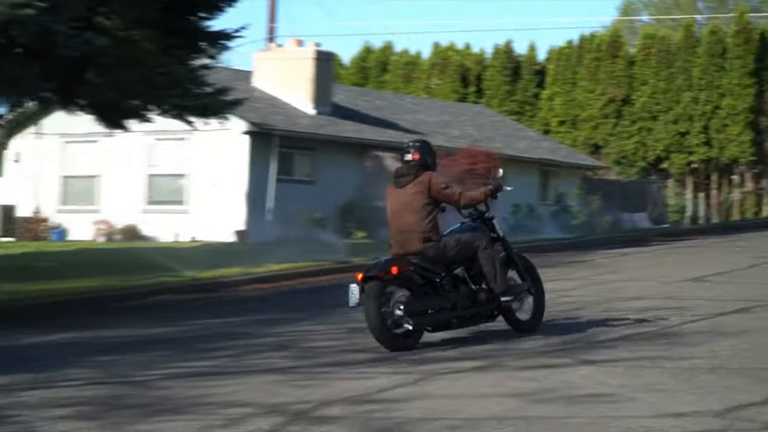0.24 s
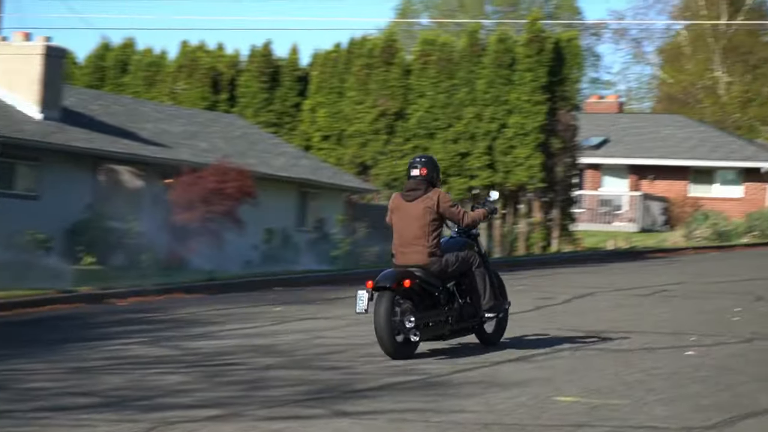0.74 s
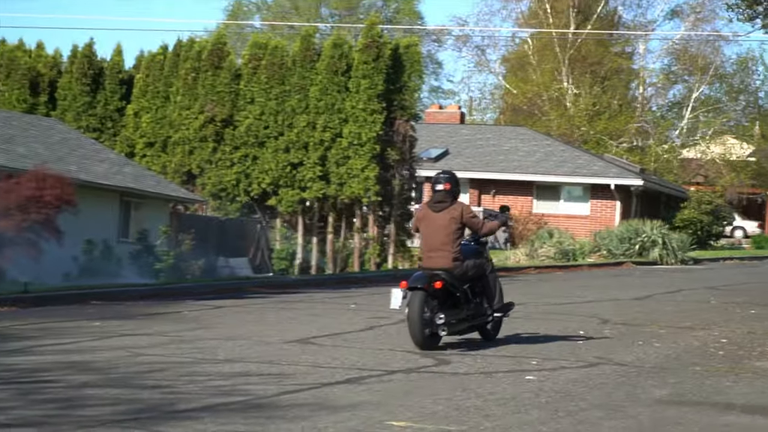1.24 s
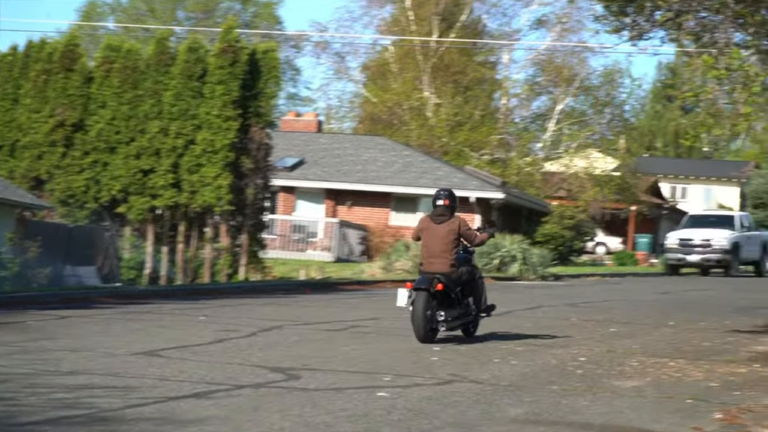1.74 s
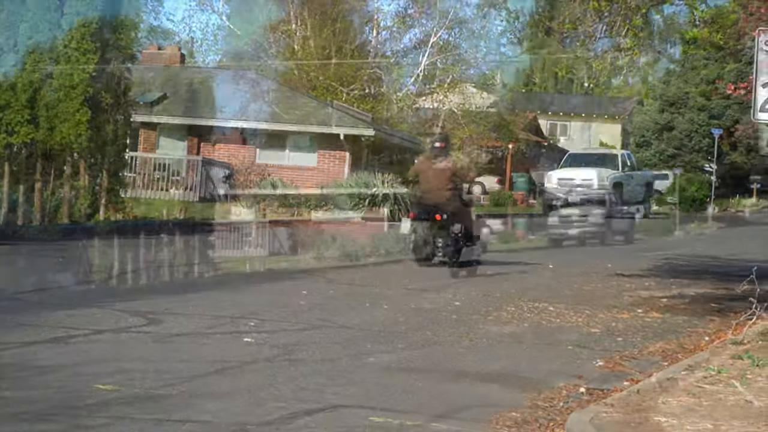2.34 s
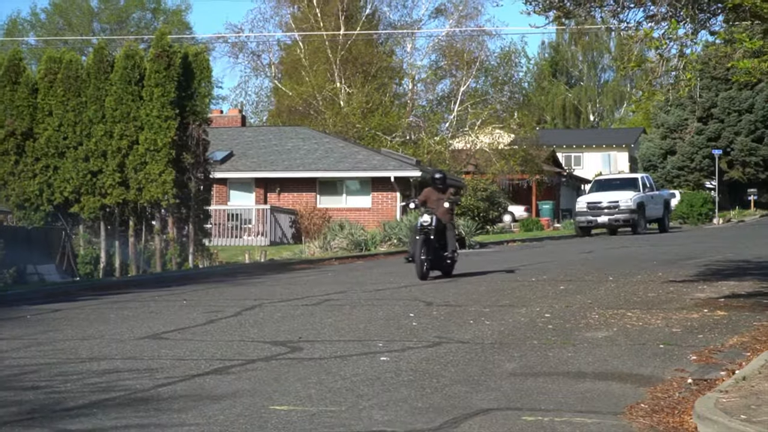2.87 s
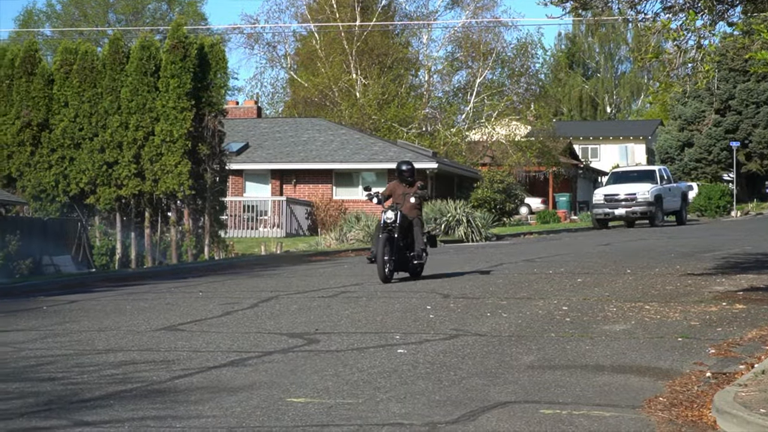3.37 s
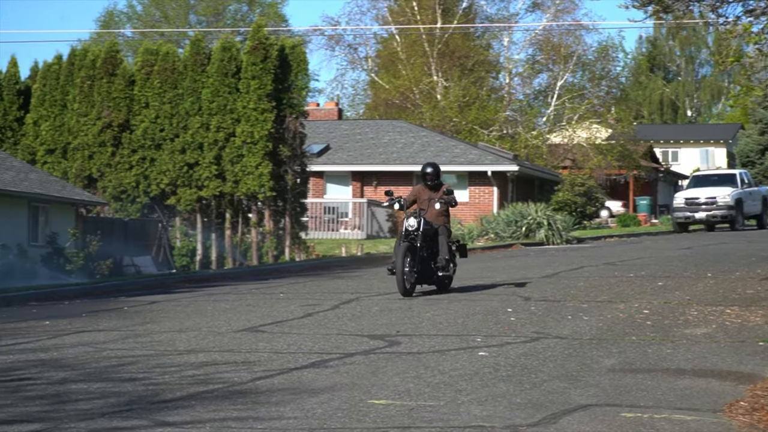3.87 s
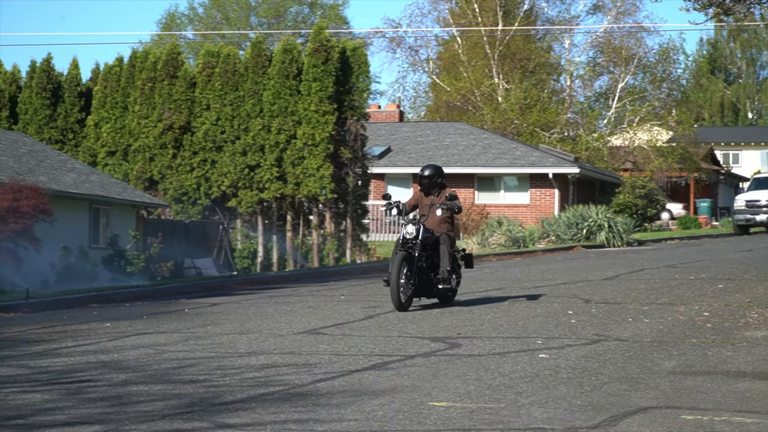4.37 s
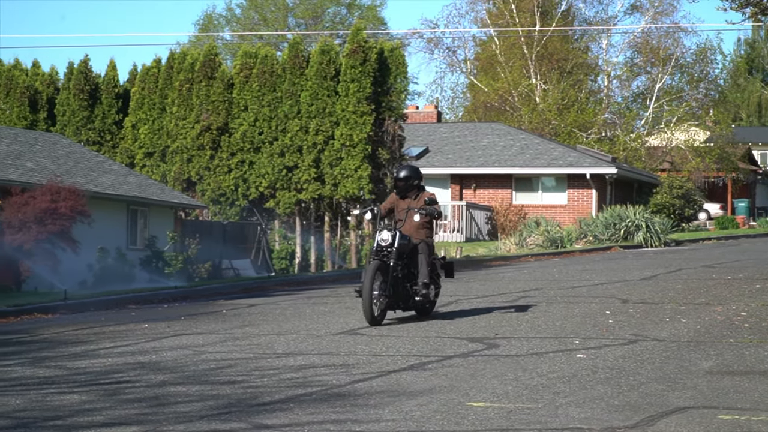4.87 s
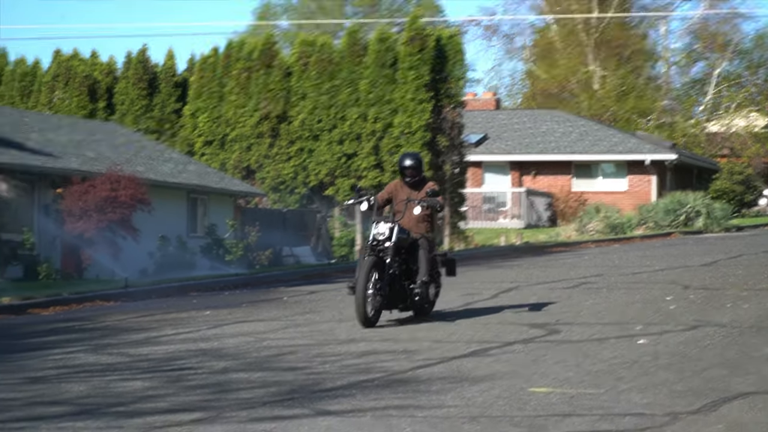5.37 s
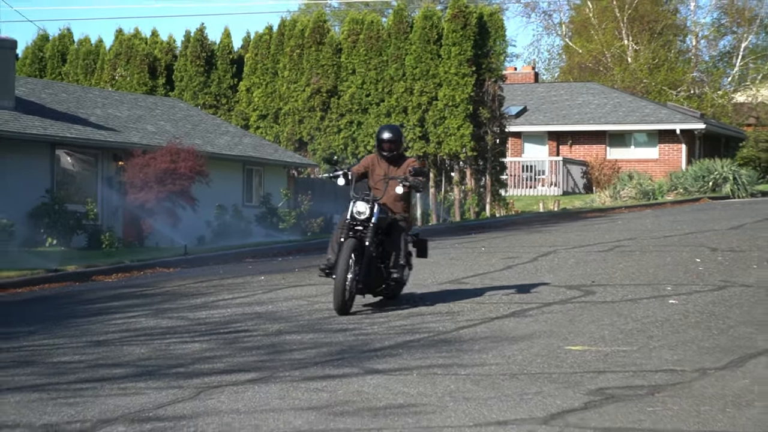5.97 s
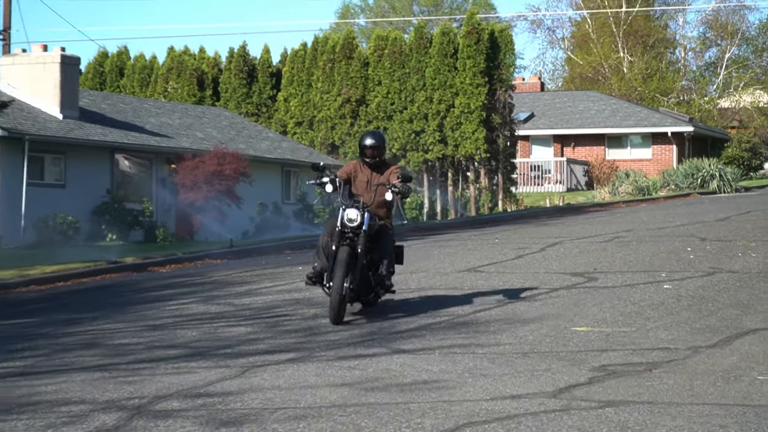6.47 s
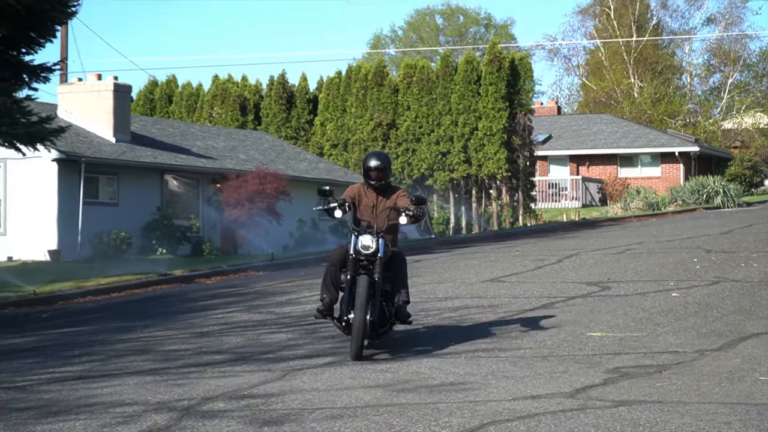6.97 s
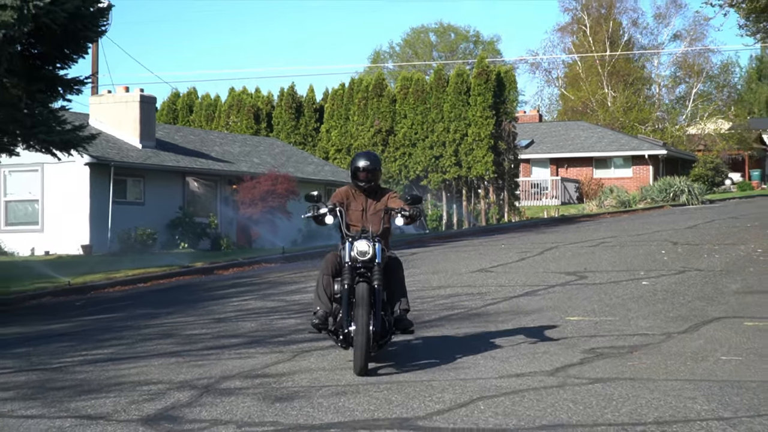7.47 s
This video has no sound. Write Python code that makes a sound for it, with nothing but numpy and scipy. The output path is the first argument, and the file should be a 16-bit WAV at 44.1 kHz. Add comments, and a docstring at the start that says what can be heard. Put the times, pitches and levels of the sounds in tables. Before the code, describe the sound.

On a quiet street, a large motorcycle accelerates away from the microphone with a booming, uneven exhaust and one sharp crack. After about two seconds the throttle closes and the gearbox clunks. Now quieter and more distant, the engine settles to a thumping idle, knocks into gear and rolls slowly nearer with light valve ticking. A few faint bird chirps sit behind it.

```python
"""A big V-twin motorcycle pulls away up a quiet street; the revs climb until the throttle shuts with a
clunk. It then rolls back from further off: the revs sink to a loping idle, a gear knocks in, it nears.
Two unevenly spaced firings per cycle drive the exhaust boom, pipe bark and rasp; valves tick, meshes
whine, the drive belt hums. Behind it: street noise, a faint bird and a dull echo off the houses."""
import sys
import numpy as np
from scipy import signal
from scipy.fft import rfft, irfft, next_fast_len
from scipy.io import wavfile

SR = 44100
rng = np.random.default_rng(int(sys.argv[2]) if len(sys.argv) > 2 else 0)


def unload_audio(sound):
    """Save the sound as a 16-bit wav file, at the path given as the first command line argument."""
    columns = np.transpose(np.atleast_2d(sound))
    # keep every value between -1 and 1, then stretch to whole-number steps
    steps = np.round(np.clip(columns, -1, 1) * 32767)
    wavfile.write(sys.argv[1], SR, steps.astype(np.int16))


N = 340452
TIME = np.arange(N) / SR
FIRING_LAG = 315 / 720  # second cylinder after the first [cycles]
START_RPM, THROTTLE_SHUT_S = 1801, 2.17
COAST_RPM, IDLE_RPM, SINK_AT_S = 1375, 1049.75, 2.965


def from_db(db):
    """Decibels to gain."""
    return 10 ** (np.asarray(db) / 20)


def unit_rms(x):
    """Scale to an rms of 1."""
    return x / np.sqrt(np.mean(x ** 2) + 1e-20)


def drift(corner_hz):
    """Smooth random wander, rms 1."""
    step = 40
    pole = np.exp(-2 * np.pi * corner_hz * step / SR)
    noise = rng.standard_normal(N // step + 2002)
    slow = signal.lfilter([1], [1, -2 * pole, pole * pole], noise)[2000:]
    return np.interp(np.arange(N) / step, np.arange(len(slow)), unit_rms(slow))


def cut(x, hz, kind, order=4):
    """Butterworth high- or low-pass."""
    return signal.sosfilt(signal.butter(order, hz, kind, fs=SR, output="sos"), x)


def coloured(x, spectrum):
    """Filter by a curve of (frequency [Hz], gain [dB])."""
    size = next_fast_len(N + 4096)
    hz, gain_db = np.transpose(spectrum)
    log_hz = np.log(np.arange(size // 2 + 1) * SR / size + 1)
    return irfft(rfft(x, size) * from_db(np.interp(log_hz, np.log(hz), gain_db)), size)[:N]


def hump(x, centre, half_width):
    """Resonance curve, peak 1."""
    return 1 / (1 + ((x - centre) / half_width) ** 2)


def ring(clicks, hz, t60_s):
    """One mode: a unit click starts a decaying sine of height 1."""
    r, w = from_db(-60 / (t60_s * SR)), 2 * np.pi * hz / SR
    return signal.lfilter([0, np.sin(w)], [1, -2 * r * np.cos(w), r * r], clicks + 1e-18)


def decay(clicks, tau_s):
    """Each click starts an exponential envelope."""
    return signal.lfilter([1], [1, -np.exp(-1 / (tau_s * SR))], clicks + 1e-18)


def each_cycle(cycle, phase, spread_db):
    """A click of random strength whenever the engine passes `phase` [cycles]."""
    passed = np.diff(np.floor(cycle - phase), prepend=np.floor(-phase)) > 0
    return passed * from_db(spread_db * np.clip(rng.standard_normal(N), -2, 2))


def crank(rpm):
    """Four-stroke cycles turned so far, two revolutions each."""
    return np.cumsum(rpm) / SR / 120


def nearness_db(start_s, from_m, m_per_s):
    """Spherical spreading at constant speed, 0 dB at start_s."""
    distance_m = np.maximum(from_m + m_per_s * (TIME - start_s), 1)
    return 20 * np.log10(from_m / distance_m)


def street():
    """Steady, low background noise."""
    # noise spectrum: (frequency [Hz], relative level [dB])
    spectrum = [(30, -29), (100, -3), (400, -6), (1000, -12.5), (2500, -26), (6000, -25), (10000, -31.5),
                (15000, -37.5)]
    return from_db(-49.5) * unit_rms(coloured(rng.standard_normal(N), spectrum))


def bird():
    """Short gliding whistles from the trees."""
    # chirps: (time [s], length [s], start [Hz], end [Hz], level [dB])
    chirps = [(5.93, 0.068, 5130, 3270, -54), (6.04, .08, 5040, 3330, -58), (6.43, 0.08, 4300, 3370, -56),
              (6.823, 0.1, 5100, 3360, -55), (7.047, .06, 3670, 4500, -53)]
    out = np.zeros(N)
    for at_s, length_s, start_hz, end_hz, db in chirps:
        along = np.clip((TIME - at_s) / length_s, 0, 1)
        hz = start_hz + (end_hz - start_hz) * along + 60 * drift(79)
        out += from_db(db) * np.sin(np.pi * along) * np.sin(2 * np.pi * np.cumsum(hz) / SR)
    return out


def house_echo(x, echo_db, tau_s, lowpass_hz):
    """House fronts and hedges scatter back a faint dull tail."""
    age_s = np.arange(SR // 2) / SR
    tail = rng.standard_normal(len(age_s)) * np.exp(-age_s / tau_s) * (age_s > .025)
    echo = signal.fftconvolve(x, tail / np.linalg.norm(tail))[:N]
    return from_db(echo_db) * cut(echo, lowpass_hz, "low", order=2)


def belt(start_s=4.9, fade_s=1, start_hz=305, hz_per_s=17):
    """The toothed belt hums, rising slowly in pitch."""
    age_s = np.maximum(TIME - start_s, 0)
    hz = start_hz + hz_per_s * age_s + 1.57 * drift(5.3)
    level = np.minimum(age_s / fade_s, 1) * from_db(-57 + 1.4 * drift(5.6))
    return np.sqrt(2) * level * np.sin(2 * np.pi * np.cumsum(hz) / SR)


def whine(cycle, teeth, ripple, slack, chatter):
    """Mesh tone, smeared by crank surge and chain slack, chopped by uneven tooth contact."""
    turned = cycle + ripple * np.sin(4 * np.pi * cycle) + slack * drift(7.22)
    tone = np.sin(2 * np.pi * teeth * turned + chatter * drift(60))
    return unit_rms(tone * from_db(4.6 * chatter * drift(37)))


def engine_braking(cycle, rpm):
    """While the wheel drives the engine, each mesh whines as the revs sink through its range."""
    # meshes: (teeth [per cycle], loudest at [rpm], half width [rpm], level [dB])
    meshes = [(167.6, 1280, 110, -49.5), (134, 1115, 74, -55)]
    driven = np.interp(TIME - SINK_AT_S, [.45, .7], [1, 0])
    return driven * sum(from_db(db) * hump(rpm, at_rpm, width_rpm)
                        * whine(cycle, teeth, ripple=.0016, slack=.0024, chatter=1.03)
                        for teeth, at_rpm, width_rpm, db in meshes)


def sharp_knocks(crack_db, crack_s, crack_hz):
    """One exhaust crack while pulling away, then gear clunks; each a noise burst and ringing metal."""
    # sharp knocks: (time [s], level [dB])
    knocks = [(0.720, -16.5), (2.300, -16), (2.310, -16.5), (2.342, -38), (2.360, -22), (3.716, -19.5),
              (3.721, -18), (3.728, -22), (3.733, -28)]
    # metal case modes: (frequency [Hz], relative level [dB], t60 [s])
    modes = [(402, -6, 0.043), (770, -1, 0.029), (900, 7.5, 0.018), (1276, 2.5, 0.019), (1750, 3.5, 0.011),
             (2240, -3, 0.02), (2800, -8.5, 0.033), (3770, -19.5, 0.11), (5890, -41, .02)]
    at_s, knock_db = np.transpose(knocks)
    blows = np.bincount((at_s * SR).astype(int), from_db(knock_db), N)
    case = sum(ring(blows * from_db(db - 13.5 + rng.standard_normal(N)), hz, t60_s)
               for hz, db, t60_s in modes)
    bursts = decay(blows, crack_s) * rng.standard_normal(N)
    crack = cut(cut(bursts, crack_hz, "low", order=1), 6400, "low", order=8)
    body = from_db(-34) * ring(bursts, 360, .036)
    return cut(case, 4700, "low") + body + from_db(crack_db) * cut(crack, 320, "high", order=2)


def rattle(cycle, phase):
    """Each firing shakes thin metal, which rings briefly."""
    # valve gear and heat shield modes: (frequency [Hz], relative level [dB], t60 [s])
    modes = [(2615, -11, 0.03), (5590, -11.5, .012), (7460, -13.5, .008), (7740, -24, .008)]
    out = 0
    for hz, db, t60_s in modes:
        shakes = each_cycle(cycle, phase, 4.3) + each_cycle(cycle, phase + FIRING_LAG, 2.6)
        out += from_db(db) * ring(shakes, hz, t60_s)
    return out


def rasp(cycle, phase, colour, low_hz, jet_s, jet_db, spit_db, tick_s, tick_db):
    """Steady mechanical hiss, a bright jet per firing, and the ticks of four valves closing."""
    firings = (phase, phase + FIRING_LAG)
    jets = decay(sum(each_cycle(cycle, at, 2.6) for at in firings), jet_s)
    closings = sum(each_cycle(cycle, at + valve, 2.9) for at in firings for valve in (.2, .33))
    ticks = decay(closings, tick_s)
    hiss = (1 + from_db(jet_db) * jets + from_db(tick_db) * ticks) * rng.standard_normal(N)
    spit = from_db(spit_db) * cut(jets * rng.standard_normal(N), 6700, "high")
    return unit_rms(cut(coloured(hiss + spit, colour), low_hz, "high"))


def pipe_scatter(tau_s):
    """Pipe reflections smear a pulse in time but keep its spectrum flat."""
    age_s = np.arange(4096) / SR
    spectrum = rfft(rng.standard_normal(len(age_s)) * np.exp(-age_s / tau_s))
    return irfft(spectrum / np.abs(spectrum))[:len(age_s) // 2]


def bark(cycle, phase, colour, low_hz, high_hz, ring_s, puff_s, turbulence, steady, spread_db):
    """Each cylinder's blowdown rattles down its own pipe and drags a puff of turbulence."""
    fired = [each_cycle(cycle, phase + lag, spread_db) for lag in (0, FIRING_LAG)]
    pipes = sum(signal.fftconvolve(pulses, pipe_scatter(ring_s))[:N] for pulses in fired)
    puffs = (steady + decay(sum(fired), puff_s)) * rng.standard_normal(N)
    pipes = unit_rms(cut(pipes, low_hz, "high"))
    puffs = unit_rms(cut(puffs, .68 * low_hz, "high"))
    return unit_rms(cut(coloured(pipes + turbulence * puffs, colour), high_hz, "low"))


def lope(cycle, phase):
    """Every second cycle a fuller charge burns and thumps the silencer."""
    # skipped beats: (time [s])
    skips_s = [3.45, 4.37, 5.3]
    # silencer modes: (frequency [Hz], relative level [dB], t60 [s])
    modes = [(105, 3.5, 0.04), (153, 2, 0.048), (220, -1.5, 0.043), (291, -2.5, 0.031)]
    fuller = (np.floor(cycle) + np.searchsorted(skips_s, TIME)) % 2 == 0
    blows = cut(from_db(-31.5) * fuller * each_cycle(cycle, phase, spread_db=2), 444, "low", order=2)
    return sum((-1) ** k * from_db(db) * ring(blows, hz, t60_s)
               for k, (hz, db, t60_s) in enumerate(modes))


def boom(cycle, orders, phase, pipe_order, pipe_q, intake, intake_lag, growl_db, dispersion, waver_db,
         rough, muffle_hz, low_cut_hz):
    """Low exhaust lines: two uneven firings and an intake gulp swing the air; weak lines waver more."""
    common_db = waver_db * drift(9.3)
    cycle_hz = np.gradient(cycle) * SR
    strongest_db = max(db for _, db in orders)
    push_phases = phase + np.array([0, intake_lag, FIRING_LAG])
    out = 0
    for k, db in orders:
        hz = k * cycle_hz
        pushes = np.exp(-2j * np.pi * k * push_phases) @ [1, intake, 1]
        pipe = 1 / (1 + 1j * pipe_q * (k / pipe_order - pipe_order / k))
        loose = rough * from_db(.5 * (strongest_db - db))
        angle = 2 * np.pi * k * cycle + np.angle(pushes * pipe) + loose * drift(4.1)
        angle -= np.pi * dispersion * (k - 5) ** 2  # higher lines linger in the silencer
        chamber_db = growl_db * hump(hz, 252.4, 11)  # silencer chamber
        muffled = 1 / (1 + np.exp((hz - muffle_hz) / 36))
        low_cut = 1 / (1 + (low_cut_hz / hz) ** 6)  # the deepest lines are faint
        level = from_db(db + common_db + chamber_db + 10.3 * loose * drift(4.1))
        out += muffled * low_cut * level * np.cos(angle)
    return unit_rms(out)


def idling_rpm(sink_s=.173):
    """Revs sink to idle in an S-curve, sag twice and are caught by a touch of throttle."""
    # idle swells: (time [s], half length [s], change [rpm])
    swells = [(5.01, .34, -34.2), (6.187, .748, -43.6), (6.523, .211, 91.1)]
    coasting = (COAST_RPM - IDLE_RPM) / (1 + np.exp((TIME - SINK_AT_S) / sink_s))
    hunting = sum(rpm * np.exp(-((TIME - at_s) / half_s) ** 2) for at_s, half_s, rpm in swells)
    return IDLE_RPM + coasting + hunting


def rolling_back(start_s=2.42):
    """Closed throttle, drawing nearer: soft uneven firings, chain and valves to the fore."""
    # exhaust lines: (order [per cycle], relative level [dB])
    orders = [(4, -41), (5, -34), (6, -50), (7, -32), (8, -43), (9, -41), (10, -47), (11, -47), (12, -42),
              (13, -46.5), (14, -59), (15, -43.5), (16, -51.5), (17, -45.5), (18, -62), (19, -49),
              (20, -56), (21, -51.5), (23, -57), (26, -55.5), (30, -55)]
    # pipe and engine colour: (frequency [Hz], gain [dB])
    colour = [(200, 3.5), (290, -6), (400, -8), (480, -2.5), (640, -3), (1050, -15.5), (1450, -15.5),
              (2000, -21.5), (2900, -22), (3600, -25), (4350, -29), (5200, -34), (8000, -46), (15500, -76)]
    # chain whines: (teeth [per cycle], level against the rasp at idle [dB])
    whines = [(146, -9.5), (167, -4), (333, -7), (500, -16.5)]
    # boom, bark, rasp: (level at start_s [dB], share of the nearness gain [dB/dB])
    levels = [(-34.5, 1.05), (-44.5, 0.84), (-54, 0.67)]
    rpm, phase = idling_rpm(), .31
    cycle = crank(rpm)
    near_db = nearness_db(start_s, from_m=22.25, m_per_s=-2.77)
    boom_gain, bark_gain, rasp_gain = [from_db(db + share * near_db) for db, share in levels]
    low = boom(cycle, orders, phase=.906, pipe_order=12.5, pipe_q=3.1, intake=1.054, intake_lag=.89,
               growl_db=-10, dispersion=.0182, waver_db=1.77, rough=.12,
               muffle_hz=217 + 15 * near_db, low_cut_hz=38.7)
    mid = bark(cycle, phase, colour, low_hz=245, high_hz=1510, ring_s=.019, puff_s=.034,
               turbulence=4.4, steady=2.9, spread_db=3.5)
    top = rasp(cycle, phase, colour, low_hz=1370, jet_s=.008, jet_db=-9, spit_db=-8,
               tick_s=.0052, tick_db=-3.5)
    slackness = np.interp(rpm, [IDLE_RPM, COAST_RPM], [1, .15])
    chain = slackness * sum(from_db(db) * whine(cycle, teeth, ripple=.0016, slack=.00337, chatter=.7)
                            for teeth, db in whines)
    engine = boom_gain * low + bark_gain * mid + rasp_gain * (top + chain) + engine_braking(cycle, rpm)
    lope_and_belt = from_db(near_db) * (lope(cycle, phase + FIRING_LAG) + belt())
    gate = np.interp(TIME, (start_s, 2.32), [0, 1])  # switches on abruptly
    return gate * (engine + lope_and_belt)


def pulling_rpm(climb_rpm_per_s=368.5, hang_s=.11, fall_rpm_per_s=2200):
    """Revs climb evenly until the throttle shuts, hang, then fall."""
    climbing_s = np.minimum(TIME, THROTTLE_SHUT_S)
    falling_s = np.clip(TIME - THROTTLE_SHUT_S - hang_s, 0, .5)
    return START_RPM + climb_rpm_per_s * climbing_s - fall_rpm_per_s * falling_s


def riding_away(throttle_lag_s=.099, fade_out_s=(2.35, 2.516)):
    """Open throttle: louder with the revs, fainter with distance, dropping when the throttle shuts."""
    # exhaust lines: (order [per cycle], relative level [dB])
    orders = [(2, -24.5), (3, -33), (4, -20.5), (5, -16), (6, -32), (7, -26), (8, -26), (9, -26), (10, -27),
              (11, -26.5), (12, -32.5), (13, -35.5), (14, -35.5), (15, -40), (16, -32), (17, -34.5),
              (19, -33.5), (21, -36.5), (23, -37.5), (25, -37.5), (27, -35.5)]
    # pipe and engine colour: (frequency [Hz], gain [dB])
    colour = [(250, -1), (480, -10.5), (700, -14), (900, -17), (1250, -17.5), (1650, -24.5), (2100, -26.5),
              (2800, -25.5), (3700, -31.5), (4800, -34), (5600, -33.5), (6800, -44), (8000, -46.5),
              (15500, -66.5)]
    # meshes: (teeth [per cycle], case resonance [Hz], half width [Hz], level against the bark [dB])
    meshes = [(31.4, 634, 55, -5.5), (61.4, 965, 33, -7.5), (62.05, 1180, 120, -11.5),
              (166.3, 2560, 520, -16.5)]
    # boom, bark, rasp: (start level [dB], slope [dB per doubling of revs], change on shutting [dB])
    levels = [(-13.5, 5.5, -8.5), (-30.6, 7.5, -3.5), (-37.5, -0.5, -2)]
    rpm, phase = pulling_rpm(), .57
    cycle, cycle_hz, octaves = crank(rpm), rpm / 120, np.log2(rpm / START_RPM)
    near_db = nearness_db(0, from_m=7.37, m_per_s=3.55)
    shut = 1 - np.exp(-np.maximum(TIME - THROTTLE_SHUT_S, 0) / throttle_lag_s)
    twist_db = 1.2 * np.exp(-((TIME - .92) / .26) ** 2)  # a further twist of the throttle
    boom_gain, bark_gain, rasp_gain = [
        from_db(db + near_db + twist_db + slope_db * octaves + shut_db * shut)
        for db, slope_db, shut_db in levels]
    low = boom(cycle, orders, phase=.029, pipe_order=12, pipe_q=.086, intake=1.82, intake_lag=.733,
               growl_db=4.5, dispersion=.0258, waver_db=.3, rough=.02,
               muffle_hz=433 + 15 * near_db, low_cut_hz=42.4)
    mid = bark(cycle, phase, colour, low_hz=419, high_hz=1820, ring_s=.018, puff_s=.029,
               turbulence=1, steady=2, spread_db=1)
    top = rasp(cycle, phase - .02, colour, low_hz=1660, jet_s=.0064, jet_db=-9.5, spit_db=8.5,
               tick_s=.0007, tick_db=-11)
    gears = sum(from_db(db) * hump(teeth * cycle_hz, hz, width_hz)
                * whine(cycle, teeth, ripple=.00085, slack=.00085, chatter=.41)
                for teeth, hz, width_hz, db in meshes)
    bright = bark_gain * (mid + gears) + rasp_gain * (top + from_db(5) * rattle(cycle, phase))
    fade = np.interp(TIME, fade_out_s, [1, 0]) * np.minimum(TIME / .002, 1)
    return fade * boom_gain * low + fade ** 2.4 * bright


def scene():
    """Engine, sharp knocks and bird, their echo, and street noise; mono."""
    engine = riding_away() + rolling_back()
    knocks_and_bird = sharp_knocks(crack_db=-7, crack_s=.0044, crack_hz=1780) + bird()
    background = street()
    echo = house_echo(from_db(-6) * engine + knocks_and_bird, echo_db=-7, tau_s=.033, lowpass_hz=4100)
    return (engine + knocks_and_bird + echo + background)[None]


def record(dry):
    """Steep low-pass."""
    cutoff_hz = 15650
    return signal.sosfilt(signal.ellip(12, .1, 80, cutoff_hz, fs=SR, output="sos"), dry)


dry = scene()
out = record(dry)
unload_audio(out)
```